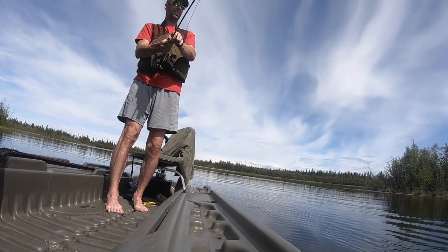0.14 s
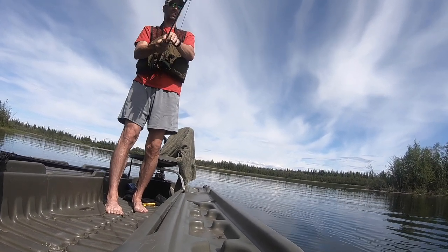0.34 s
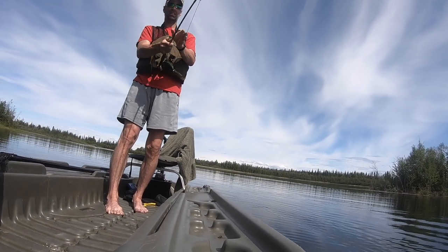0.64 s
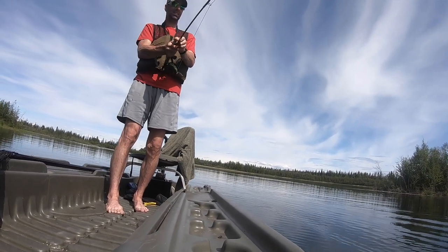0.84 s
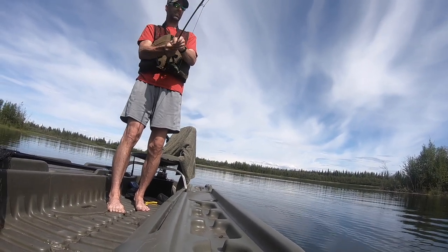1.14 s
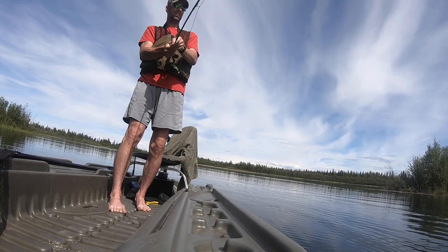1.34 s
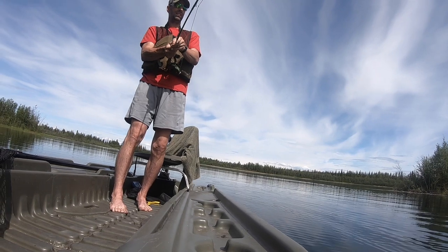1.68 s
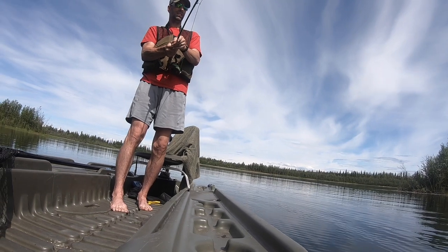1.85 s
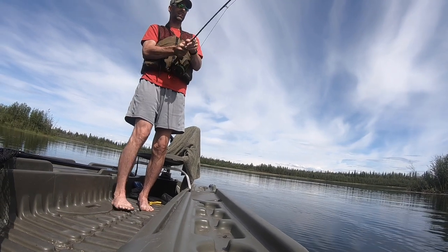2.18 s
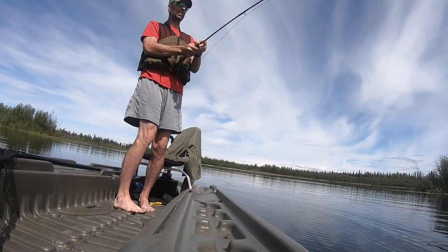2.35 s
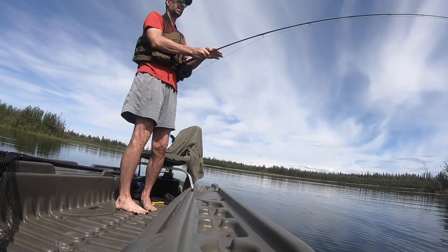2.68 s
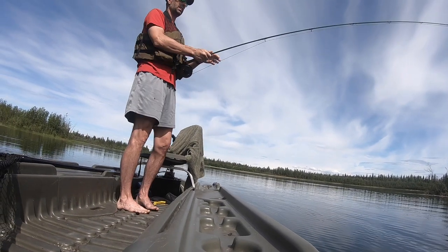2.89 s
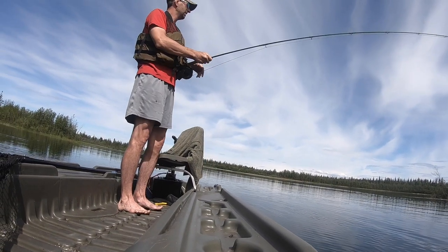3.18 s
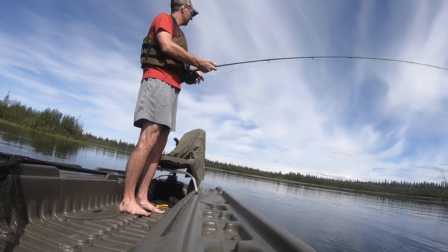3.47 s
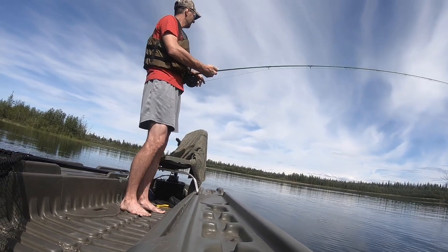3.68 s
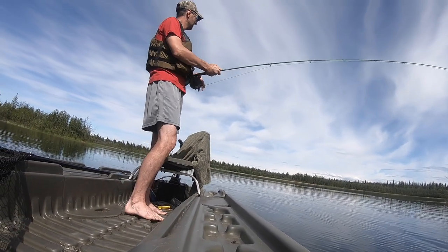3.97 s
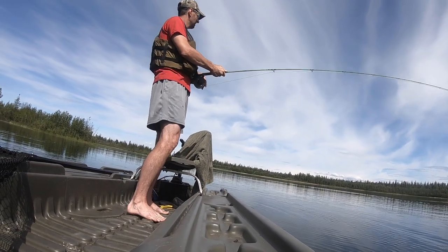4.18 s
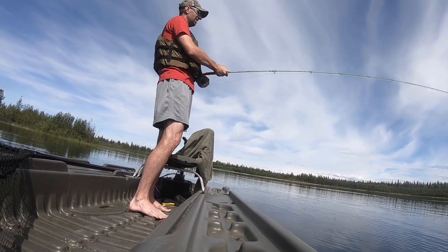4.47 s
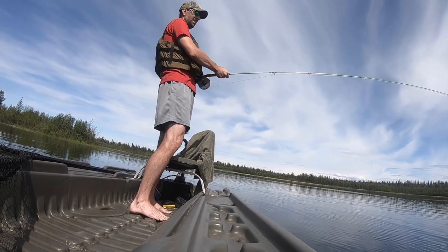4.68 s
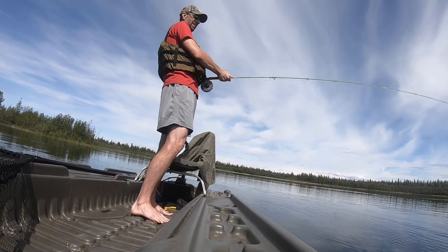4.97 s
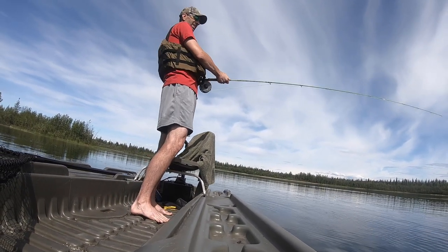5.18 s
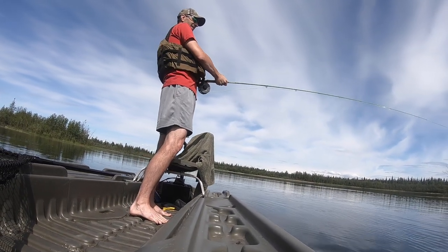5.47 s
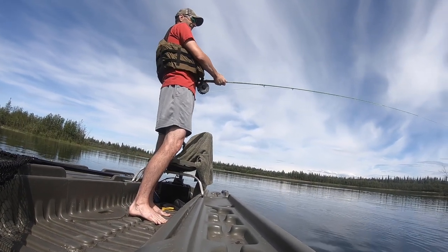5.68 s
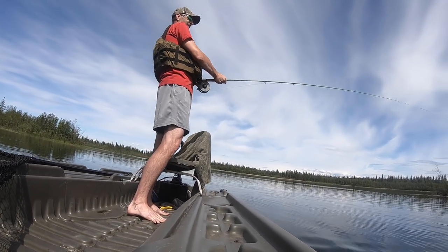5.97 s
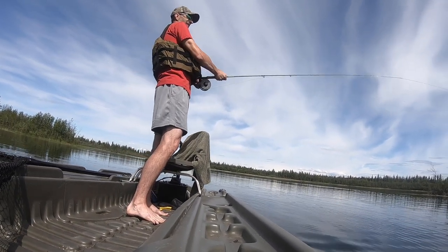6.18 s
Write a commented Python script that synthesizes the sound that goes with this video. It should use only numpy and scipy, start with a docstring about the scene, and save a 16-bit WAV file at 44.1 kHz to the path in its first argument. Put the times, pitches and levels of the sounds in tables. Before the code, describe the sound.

Hard tackle clacks and a few reel ticks, then irregular low booming thumps through a plastic boat hull, ending in a quickening reel whirr.

```python
"""Hard tackle clacks and a reel's pawl ticks, then a small plastic boat booms and creaks under a barefoot angler.
Rough forces drive the hull modes as his weight shifts; blows ring the deck panels; soles scuff as banded noise.
Short rattles and clicks ring the tackle and reel, and the gears whirr louder with faster late ticks.
Water and air keep the hull humming faintly on a calm lake.
The microphone pair is fixed to the hull: its right capsule takes the hull hardest and overloads."""
import sys
import numpy as np
from scipy import signal
from scipy.io import wavfile
from scipy.ndimage import uniform_filter1d

SR = 44100
rng = np.random.default_rng(int(sys.argv[2]) if len(sys.argv) > 2 else 0)


def digitize_waveform(pressure):
    """Quantize a signal to 16-bit integers and store it at the path in sys.argv[1].

    Rows of a 2-D input are taken as channels; values are limited to [-1, 1].
    """
    field = np.atleast_2d(pressure).T
    bounded = np.clip(field, -1, 1)
    quanta = np.round(bounded * 32767).astype(np.int16)
    wavfile.write(sys.argv[1], SR, quanta)


N = 279540


def from_db(db):
    """Decibels to amplitude gain."""
    return 10 ** (np.asarray(db) / 20)


def rms_one(x):
    """Scale to unit power."""
    return x / np.sqrt(np.mean(x ** 2) + 1e-20)


def in_time(rows):
    """Interpolate a (time, level) curve at every sample."""
    time_s, level = np.transpose(rows)
    return np.interp(np.arange(N) / SR, time_s, level)


def at_hz(points, hz):
    """Read a spectrum on a log-frequency axis."""
    point_hz, value = np.transpose(points)
    return np.interp(np.log(hz), np.log(point_hz), value)


def drift(rate_hz):
    """Slow random curve of rms 1: white noise through two equal low-pass poles, run at SR / 40."""
    r = np.exp(-80 * np.pi * rate_hz / SR)
    white = rng.standard_normal(N // 40 + 2002)
    slow = signal.lfilter([1], [1, -2 * r, r * r], white)[2000:]   # drop the settling
    return np.interp(np.arange(N) / 40, np.arange(len(slow)), rms_one(slow))


def resonate(x, hz, width_hz):
    """Two-pole resonance with gain 1 on top."""
    r = np.exp(-np.pi * width_hz / SR)
    zeros = np.array([1, 0, -1]) * (1 - r * r) / 2
    poles = [1, -2 * r * np.cos(2 * np.pi * hz / SR), r * r]
    return signal.lfilter(zeros, poles, x + 1e-18)


def ring(clicks, hz, t60_s):
    """A unit click starts a dying sine of initial height 1."""
    r, w = from_db(-60 / (t60_s * SR)), 2 * np.pi * hz / SR
    return signal.lfilter([0, np.sin(w)], [1, -2 * r * np.cos(w), r * r], clicks + 1e-18)


def through_air(x, apart):
    """Both capsules hear it; diffraction round the housing makes the treble partly unlike."""
    far = np.roll(x, 9) - np.roll(x, 4)
    return np.array([np.roll(x, 1) - apart * far, x + apart * far])


def swells(time_s, rise_s, hold_s, dying_db_per_s, peak_db, rest_db, sag_db_per_s=0):
    """Level [dB] of overlapping swells: each climbs 30 dB in its rise, sags while held, then dies to rest."""
    t, power = np.arange(0, N + 40, 40) / SR, 0
    for start, rise, hold, dying, peak in np.broadcast(time_s, rise_s, hold_s, dying_db_per_s, peak_db):
        late = t - start
        lost_db = 30 * np.maximum(-late, 0) / rise
        lost_db += sag_db_per_s * np.clip(late, 0, hold)
        lost_db += dying * np.maximum(late - hold, 0)
        power = power + from_db(2 * (peak - lost_db))
    return 10 * np.log10(np.interp(np.arange(N) / SR, t, power) + from_db(2 * rest_db))


# left-right correlation of diffuse noise: (frequency [Hz], correlation [-1..1])
LIKENESS = [(60, -1), (200, -0.45), (700, -0.86), (1500, -0.69), (3200, 0.85), (7000, .4), (15000, -0.88)]


def banded_noise(spectrum, lean, patchy_db):
    """Third-octave bands of stereo noise, each with its own level, flicker, lean and likeness; rms 1."""
    out, edges_hz = 0, 20 * 2 ** np.arange(0, 9.8, 1 / 3)
    white = rng.standard_normal((2, 2, N))
    for k, (low, high) in enumerate(zip(edges_hz, edges_hz[1:])):
        hz = np.sqrt(low * high)
        gain = from_db(at_hz(spectrum, hz) + patchy_db * drift(18))
        band = signal.butter(2, [low, high], "band", fs=SR, output="sos")
        mid, side = signal.sosfilt(band, white[k % 2])
        alike = at_hz(LIKENESS, hz)
        pair = np.sqrt(1 + alike) * mid + np.sqrt(1 - alike) * side * [[1], [-1]]
        out = out + gain * pair * from_db([[at_hz(lean, hz)], [0]])
    return rms_one(out)


# idle hull and air: (frequency [Hz], relative density [dB per Hz])
HUM_COLOUR = [(20, -29.5), (55, -20), (106, -38), (129, -20), (148, -11.5), (175, -2), (213, -13.5),
              (266, -16), (581, -20), (725, -12.5), (3540, -49.5), (10200, -49.5), (15500, -59)]
# stereo balance: (frequency [Hz], left minus right [dB])
HUM_LEAN = [(30, 9), (130, -2.5), (400, -0.5)]
# the hum swells and sinks: (time [s], level [dB])
HUM_DB = [(0, -28.5), (.8, -34), (2.4, -38), (4.3, -41), (4.7, -36.5), (5.7, -40), (6.34, -31)]


def idle_hum():
    """Water and air excite the hull: coloured noise on a slow level curve."""
    return from_db(in_time(HUM_DB)) * banded_noise(HUM_COLOUR, HUM_LEAN, patchy_db=1.2)


# reel body and rod seat: (frequency [Hz], width [Hz], level [dB])
TACKLE_MODES = [(3290, 950, 7), (6330, 1700, 0.5), (8220, 2600, -7), (13100, 3700, -19)]


def tackle_body(x):
    """Broad resonances of the reel and rod seat, summed in alternating sign."""
    out = 0
    for k, (hz, width_hz, level_db) in enumerate(TACKLE_MODES):
        rung = resonate(resonate(x, hz, width_hz), hz, 2 * width_hz)
        out = out + (-1) ** k * from_db(level_db) * rung
    return out


FEET_START_S, FEET_STOP_S = .9, 5.88   # soles scuff in this span; outside it the rubbing is the reel's
# pawl ticks, in runs of like strength: (relative peak [dB], [time [s], ..])
TICKS = [(-37.5, [.171, .1797, .1892, .2005, .2155, .2371, .3349, .3543]), (-41.5, [5.9003, 2.8]),
         (-36.5, [5.9193, 5.9326, 5.9435, 5.9554, 5.966, 5.978, 5.9904, 6.0055, 6.0205, 6.035, 6.047, 6.058, 6.0664, 6.0746, 6.083, 6.099]),
         (-34.5, [6.1282, 6.139, 6.149, 6.1585, 6.1682, 6.1812, 6.1986, 6.2231, 6.249, 6.27, 6.297, 6.307]),
         (-30, [6.285, 6.3162, 6.325, 6.334])]


def crank_db():
    """Gear whirr gain from the rate of pawl ticks once the feet are still."""
    ticks = np.zeros(N)
    ticks[[round(s * SR) for _, run in TICKS for s in run if s > FEET_STOP_S]] = SR
    span = round(.045 * SR)
    rate_hz = uniform_filter1d(uniform_filter1d(ticks, span), span)
    return 0.1359 * rate_hz   # dB per Hz


def whirr():
    """Gear noise colours itself in the tackle body, louder the faster the pawl ticks."""
    gears = rms_one(tackle_body(rng.standard_normal(N)))
    return through_air(gears, apart=0.073) * from_db(1.6 * drift(29) + crank_db())


# soles on deck: (frequency [Hz], relative density [dB per Hz])
SCUFF_COLOUR = [(650, -46), (1100, -21.5), (1470, -3), (2180, -10.5), (2640, -16.5), (6250, -14.5),
                (12600, -38), (15500, -66)]


def scuff():
    """A gritty deck roughens the friction noise of the soles."""
    noise = banded_noise(SCUFF_COLOUR, [(1000, 3.5), (10000, -4)], patchy_db=1.5)
    return noise * from_db(2.5 * drift(90))


# soles and reel rubbing: (time [s], rise [s], dying [dB per s], level [dB])
RUBS = [(.11, .4, 200, -30.5), (.72, .14, 220, -46), (2.24, .3, 180, -40), (2.88, .2, 160, -31.5),
        (3.13, .4, 130, -49), (3.39, .2, 150, -50), (3.8, .3, 100, -48.5), (3.92, .08, 420, -29),
        (4.8, 2.5, 35, -60.5), (5.93, .1, 2, -59)]


def rubbing():
    """Swells of friction: sole noise in the feet's span, gear whirr outside it."""
    t = np.arange(N) / SR
    time_s, rise_s, dying_db_per_s, peak_db = np.transpose(RUBS)
    level_db = swells(time_s, rise_s, .0061, dying_db_per_s, peak_db, rest_db=-68)
    feet = (t > FEET_START_S) & (t < FEET_STOP_S)
    return from_db(level_db) * np.where(feet, scuff(), whirr())


# reel frame: (frequency [Hz], relative level [dB], t60 [s])
REEL_MODES = [(4300, -7, 0.006), (6560, -2, 0.0046), (6990, -3, .006), (9100, -10, 0.0049)]
# spool, one mode: frequency [Hz], relative level [dB], t60 [s]
SPOOL_RING = (7780, -13, 0.034)
SPOOL_FREE_S = 6.12


def reel():
    """The pawl strikes the frame's short modes; the spool rings fully once the hand leaves it."""
    time_s, tick_db = np.transpose([(s, run_db) for run_db, run in TICKS for s in run])
    at = np.round(time_s * SR).astype(int)
    spread_db = rng.normal(0, 1.6, (len(at), len(REEL_MODES) + 1))
    out = np.zeros(N)
    for k, (hz, level_db, t60_s) in enumerate([*REEL_MODES, SPOOL_RING]):
        clicks = np.zeros(N)
        clicks[at] = from_db(tick_db + level_db + 7 + spread_db[:, k])
        if k == len(REEL_MODES):
            clicks[:round(SPOOL_FREE_S * SR)] *= .15
        out += ring(resonate(clicks, hz, 1570), hz, t60_s)   # the pawl slides on, so the ring builds up
    return through_air(out, apart=0.16) * from_db([[-2.5], [1.5]])


# tackle knocks: (time [s], relative bright level [dB], ping peak [dB], rattle length [s],
#                 ping frequency [Hz], ping width [Hz])
CLACKS = [(0.0232, -14.5, -25, 0.0043, 940, 300), (0.0744, -15, -12.5, 0.0044, 2450, 500),
          (0.077, -25, -18.5, 0.0089, 884, 303), (0.107, -19.5, -3.5, 0.0047, 1270, 1710),
          (0.334, -45.5, -37, 0.043, 2250, 400), (0.77, -61, -39.5, 0.011, 3520, 119),
          (2.112, -42, -40, 0.0019, 9500, 2020), (3.431, -57, -35, 0.0029, 2100, 1216),
          (4.054, -51, -21.5, 0.0059, 2340, 252)]


def clacks():
    """Each knock is a short dying rattle; it rings the reel body and a ping of its own."""
    ping, bright, rattle = np.zeros(N), np.zeros(N), rng.standard_normal(N)
    since_s = np.arange(SR // 8) / SR
    for time_s, bright_db, ping_db, length_s, ping_hz, width_hz in CLACKS:
        at = round(time_s * SR)
        span = slice(at, at + SR // 8)
        burst = np.exp(-(since_s / length_s) ** 1.1) * rattle[span]
        rung = resonate(resonate(burst, ping_hz, width_hz), ping_hz, 2 * width_hz)
        ping[span] += from_db(ping_db) * rung / np.max(np.abs(rung))
        bright[span] += from_db(bright_db + 9.5) * burst
    return through_air(ping + tackle_body(bright), apart=0.11)


# hollow and stiff deck panels: (frequency [Hz], width [Hz], relative level at right capsule [dB],
#                                signed share at left capsule [ratio])
PANEL_MODES = [(203, 23, -6.5, -0.2), (288.4, 64, -9, -0.18), (387, 38, -4.5, -0.31),
               (514, 25.7, -8, -0.42)]
STIFF_MODES = [(698, 98, 2, -0.21), (865, 83, 3.5, -1.36), (1064, 90, -4, -0.93), (1503, 340, -14.5, -0.26)]
# hard blows on the deck: (time [s], relative level [dB])
KNOCKS = [(.566, -14), (1.497, -26.5), (1.523, -22), (2.134, -27.5), (2.954, -21), (3.304, -28),
          (3.433, -9.5), (4.782, -21.5)]


def knocks():
    """A short blow sets both panels ringing freely: the stiff one barks, the hollow one rings on."""
    time_s, knock_db = np.transpose(KNOCKS)
    at = np.round(time_s * SR).astype(int)
    hollow = [(hz, width_hz, db + 1, share) for hz, width_hz, db, share in PANEL_MODES]
    modes = [*STIFF_MODES, *hollow]
    spread_db, out = rng.normal(0, 2, (len(at), len(modes))), 0
    for k, (hz, width_hz, mode_db, share) in enumerate(modes):
        blows = np.zeros(N)
        blows[at] = from_db(knock_db + mode_db + spread_db[:, k])
        built = resonate(blows, hz, hz / 4)   # soft contact: the ring builds over a few cycles
        t60_s = np.log(1000) / (np.pi * width_hz)
        out = out + (-1) ** k * 2.04 * ring(built, hz, t60_s) * [[share], [1]]
    return out


def hull(modes, level_db, hold_s, steady, stray):
    """A rough force drives the modes; their swing is evened out, then follows the given level curve."""
    force, other = rng.standard_normal((2, N))
    left = right = 0
    for k, (hz, width_hz, mode_db, share) in enumerate(modes):
        # twice filtered for steep skirts
        main, second = [resonate(resonate(f, hz, width_hz), hz, 4.53 * width_hz) for f in (force, other)]
        gain = (-1) ** k * from_db(mode_db)
        right = right + gain * main
        left = left + gain * share * (main + stray * second)   # second path through the mount
    scale = np.sqrt(np.mean(right ** 2))
    swing = uniform_filter1d((right / scale) ** 2, round(hold_s * SR)) + 0.051
    return from_db(level_db) * np.array([left, right]) / scale / swing ** (steady / 2)


# deck panels knocked or flexed: (time [s], hollow panel level [dB], stiff panel level [dB], length [s])
FLEXES = [(0.579, -14, -41, 0.037), (0.702, -26.5, -29.5, 0.036), (1.211, -7, -31.5, 0.028),
          (1.442, -19, -38, 0.017), (1.529, -11, -23, 0.022), (1.645, -17, -75.5, 0.021),
          (1.825, -22, -36.5, 0.022), (2.145, -9.5, -26, 0.029), (2.204, -12, -32, 0.01),
          (2.297, -11.5, -38.5, 0.029), (2.598, -25, -30.5, 0.036), (2.651, -6.5, -29.5, 0.036),
          (2.872, -17, -25, 0.064), (2.964, -4.5, -23.5, 0.025), (3.098, -13, -30.5, 0.08),
          (3.322, -35, -26.5, 0.02), (3.394, -14, -35, 0.021), (3.444, -0.5, -15, 0.01),
          (3.464, -17, -27.5, 0.025), (3.593, -15, -33.5, 0.015), (3.755, -17, -32.5, 0.011),
          (3.937, -8.5, -22, 0.033), (4.067, -11.5, -23.5, 0.025), (4.794, -12, -28, 0.037),
          (5.09, -14.5, -28, 0.017), (5.454, -25, -32, 0.018)]


def flex_db(column):
    """Level of one panel: every flex comes up fast and dies away more slowly."""
    t, power = np.arange(N) / SR, np.full(N, 1e-9)
    for row in FLEXES:
        late = (t - row[0]) / row[3]
        shape = np.where(late < 0, -(2.4 * late) ** 2, -2.2 * late)
        power += from_db(2 * row[column]) * np.exp(shape)
    return 10 * np.log10(power)


def flexes():
    """Flexing deck: rough force on the hollow and the stiff panel modes."""
    hollow = hull(PANEL_MODES, flex_db(column=1), hold_s=.02, steady=.8, stray=.35)
    return hollow + hull(STIFF_MODES, flex_db(column=2), hold_s=.015, steady=.6, stray=.4)


# whole-boat mode: (frequency [Hz], width [Hz], relative level at right capsule [dB], signed left share [ratio])
SHUDDER_MODES = [(21, 5, 0, .16)]
# whole boat shuddering: (time [s], level [dB])
SHUDDERS = [(.41, -30.5), (2.45, -8.5), (3.03, -6.5), (3.298, -8), (4.041, -9.5)]


def shudders():
    """The whole boat shudders in one very low mode."""
    time_s, peak_db = np.transpose(SHUDDERS)
    level_db = swells(time_s, 0.11, 0, 85, peak_db, rest_db=-44.5)
    return hull(SHUDDER_MODES, level_db, hold_s=.2, steady=.7, stray=.3)


# deep boom, upper boom and the panels they shake:
# (frequency [Hz], width [Hz], relative level at right capsule [dB], signed left share [ratio])
DEEP_MODES = [(65, 25, -5, .12), (90, 25, 0, .09), (112, 20, -1, .06)]
UPPER_MODES = [(130, 20, -4, -.03), (150, 18, 0, -.04), (180, 30, -8, -.07)]
SHAKEN_MODES = [(290, 138, -6, 0.43), (400, 96, 2.5, -0.19)]
# weight coming down: (time [s], rise [s], hold [s], upper boom dying [dB per s],
#                      deep boom level [dB], upper boom level [dB])
THUMPS = [(0.572, 0.042, 0.0062, 218, -13, -5.5), (0.697, 0.056, 0.049, 201, -24, -7),
          (1.197, 0.048, 0.13, 222, -13, -6), (1.419, 0.011, 0.041, 203.5, -16, -6.5),
          (1.518, 0.13, 0.041, 140, -10, -1.5), (1.83, 0.023, 0.01, 210, -39, -14),
          (1.98, 0.23, 0.044, 149, -38, -15), (2.145, 0.19, 0.06, 298.5, -9, 1),
          (2.252, 0.041, 0.13, 194.5, -6.5, -1.5), (2.65, 0.15, 0.036, 84, -18, -9.5),
          (2.909, 0.079, 0.19, 63, -7, -7.5), (3.337, 0.015, 0.012, 190.5, -28, -7),
          (3.392, 0.039, 0.039, 121, -4, -10), (3.578, 0.023, 0.0077, 140, -15, -34),
          (3.748, 0.013, 0.013, 61, -11, -9.5), (3.939, 0.11, 0.2, 294, -6, -7.5),
          (4.217, .05, 0.012, 140, -17, -27), (4.432, 0.11, 0.03, 286, -36, -16),
          (4.795, 0.047, 0.054, 299, -8.5, -2.5), (4.879, 0.038, 0.031, 296.5, -6.5, -2.5),
          (4.958, 0.027, 0.017, 193, -9, -5.5), (5.095, 0.034, 0.059, 401, -13.5, -2),
          (5.181, 0.036, 0.012, 131, -9, -16), (5.383, 0.051, 0.0083, 154.5, -18.5, -10.5),
          (5.456, 0.032, 0.023, 206, -18.5, -5.5), (5.631, 0.014, 0.017, 152.5, -11, -4.5),
          (5.896, 0.023, 0.064, 109, -55, -22)]
# the hull stirring between thumps: (time [s], level [dB])
UPPER_REST = [(0, -19), (.2, -26), (.5, -24.5), (.9, -37.5), (1.2, -31.5), (3.6, -15.5), (4.5, -28.5),
              (4.75, -25), (5.2, -27.5), (6.34, -44)]
DEEP_SAG_DB_PER_S, UPPER_SAG_DB_PER_S = 11.5, 31   # upper fades first, so the held boom sinks in pitch
DEEP_DYING_SHARE = 0.87   # the deep boom rings on after the upper one


def thumps():
    """Shifting weight loads the hull: deep and upper booms swell, and strong ones shake the panels."""
    time_s, rise_s, hold_s, dying, deep_peak, upper_peak = np.transpose(THUMPS)
    deep_db = swells(time_s, rise_s, hold_s, DEEP_DYING_SHARE * dying, deep_peak, -56.5, DEEP_SAG_DB_PER_S)
    upper_rest = in_time(UPPER_REST)
    upper_db = swells(time_s, rise_s, hold_s, dying, upper_peak, upper_rest, UPPER_SAG_DB_PER_S)
    deep = hull(DEEP_MODES, deep_db, hold_s=.045, steady=.95, stray=.7)
    upper = hull(UPPER_MODES, upper_db, hold_s=.03, steady=.9, stray=.7)
    shaken = hull(SHAKEN_MODES, 1.2 * upper_db - 20.5, hold_s=0.036, steady=0.092, stray=0.61)
    return deep + upper + shaken


def scene():
    """Idle hum, rubbing and airborne tackle, then the vibrating hull."""
    background = idle_hum() + rubbing()
    tackle = reel() + clacks()
    boat = knocks() + flexes() + shudders() + thumps()
    return background + tackle + boat


OVERLOAD, STOPBAND_HZ = .995, 16100


def record(dry):
    """Overloaded peaks are cut flat, then the top is cut by 60 dB from the stopband edge up."""
    flat = np.clip(dry, -OVERLOAD, OVERLOAD)
    return signal.sosfilt(signal.cheby2(12, 60, STOPBAND_HZ, fs=SR, output="sos"), flat)


dry = scene()
out = record(dry)
digitize_waveform(out)
```